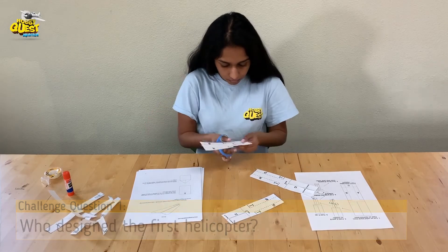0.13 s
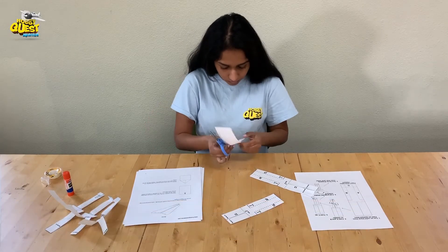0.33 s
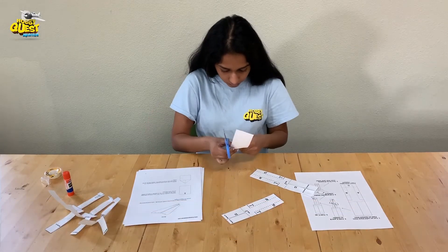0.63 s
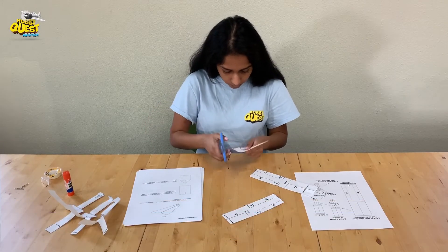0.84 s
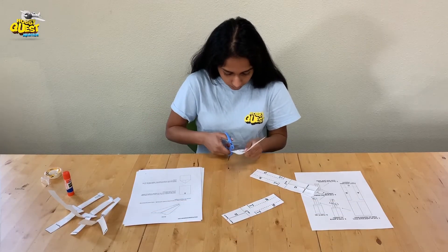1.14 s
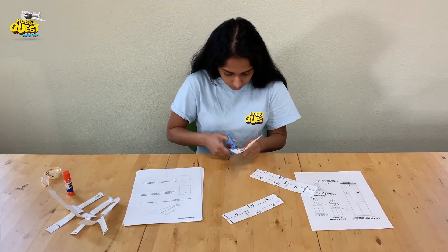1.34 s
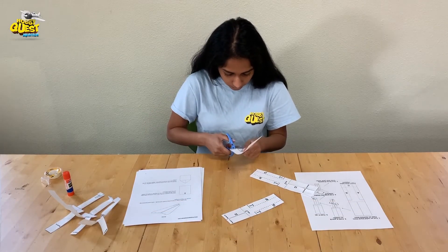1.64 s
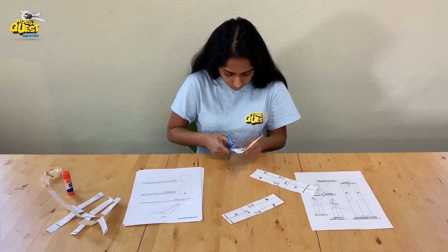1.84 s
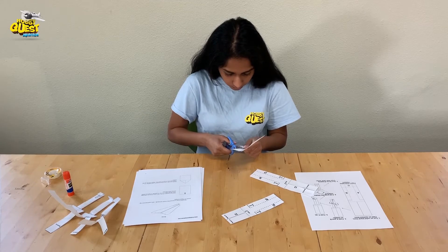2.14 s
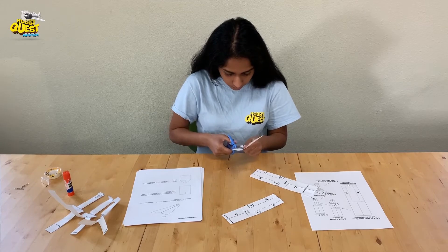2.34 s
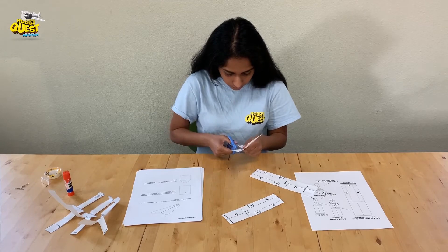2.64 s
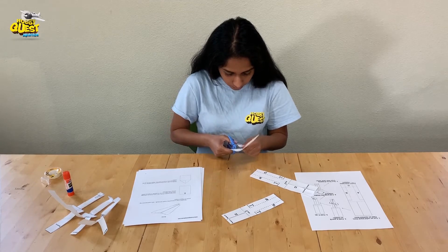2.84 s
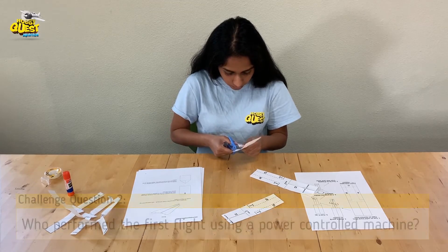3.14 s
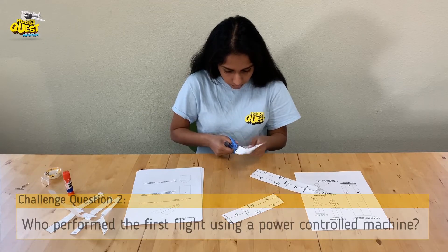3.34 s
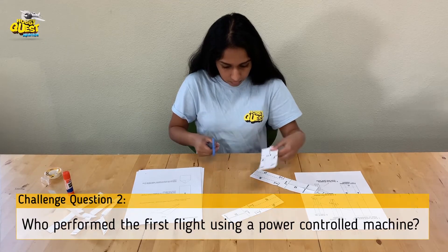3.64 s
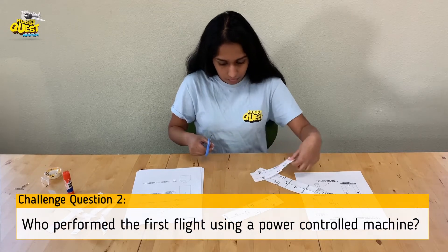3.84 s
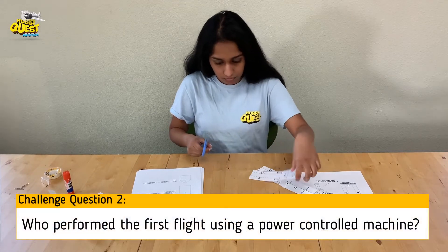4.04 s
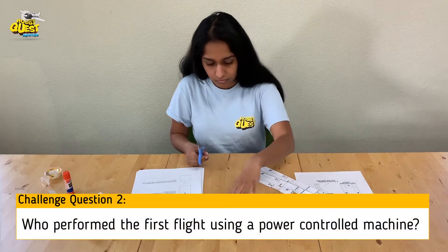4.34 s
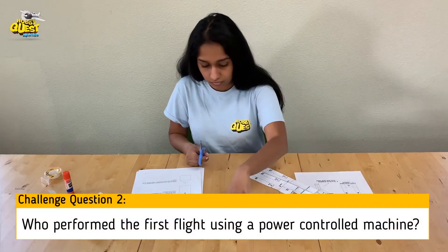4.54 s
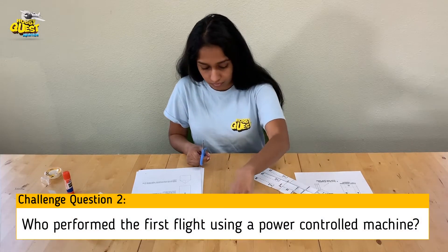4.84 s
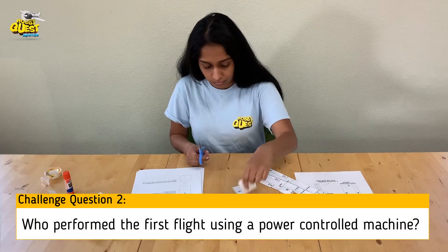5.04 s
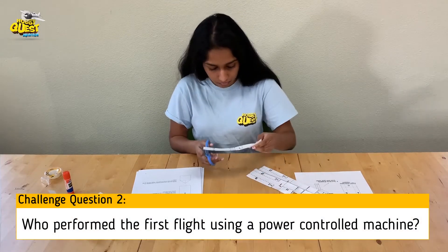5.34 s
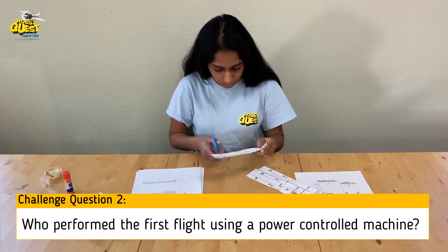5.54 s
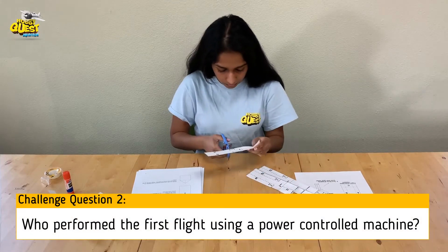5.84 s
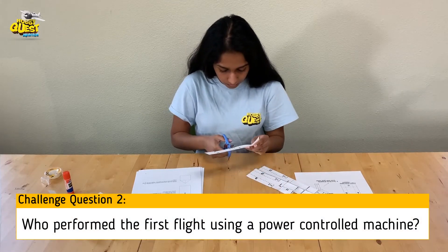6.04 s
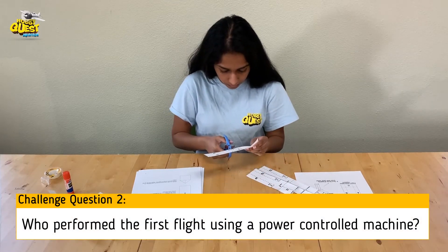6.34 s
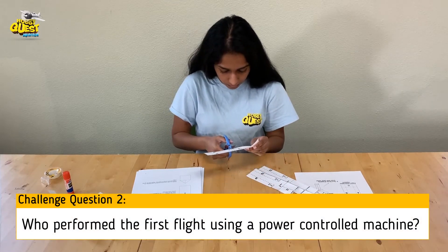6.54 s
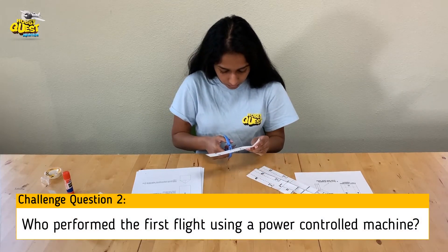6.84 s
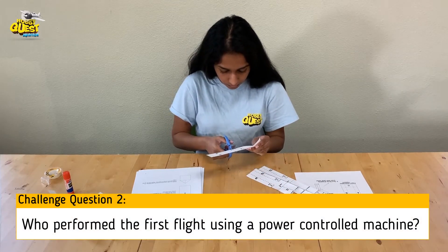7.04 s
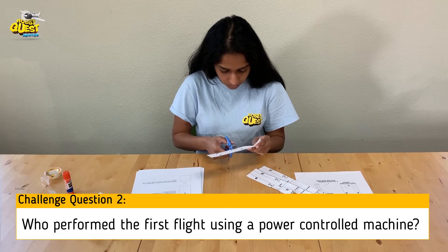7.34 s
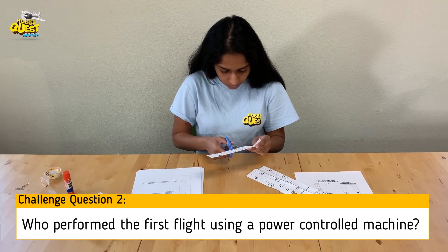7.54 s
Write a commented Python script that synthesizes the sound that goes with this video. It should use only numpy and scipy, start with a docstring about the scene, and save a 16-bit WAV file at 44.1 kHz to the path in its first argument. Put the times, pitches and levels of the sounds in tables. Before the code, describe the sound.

In a small room with a faint steady hum, paper crackles and snaps a couple of metres from the microphone. Scissors then make several short cuts, their blades clicking and the pivot squeaking briefly. The wooden table thuds softly and creaks as paper is handled with a burst of crisp snaps. The rustling dies down, leaving a few very quiet snips.

```python
"""Scissors cut paper at a wooden table in a small room, a couple of metres from a phone.
Parting fibres excite the sheet in a dense crackle and the blade edge in a rasp. Impacts ring as
paper snaps and the blades click shut; friction makes the pivot squeak and something wooden creak.
Bumps thud through floor and table. An appliance hums near twice the mains frequency and near the
octave of that, over air noise and microphone hiss."""
import sys
import numpy as np
from scipy import signal
from scipy.fft import rfft, irfft, next_fast_len
from scipy.io import wavfile

SR = 44100
rng = np.random.default_rng(int(sys.argv[2]) if len(sys.argv) > 2 else 0)


def dump_mix(stems):
    """Bounce the given channels to the path in sys.argv[1] as a 16-bit WAV at rate SR."""
    frames = np.atleast_2d(stems).T  # one column per channel
    limited = np.clip(frames, -1, 1)  # hard clip at full scale
    pcm = np.round(limited * 32767).astype(np.int16)
    wavfile.write(sys.argv[1], SR, pcm)


N = 339129
FFT_SIZE = next_fast_len(N + SR)


def undb(db):
    return 10 ** (np.asarray(db) / 20)


def level(x, db):
    """Scale to an rms level in dB."""
    return x * undb(db) / np.sqrt(np.mean(x ** 2))


def along(points, hz):
    """Interpolate (f/Hz, value) points on a logarithmic frequency axis."""
    f, v = np.transpose(points)
    return np.interp(np.log(np.maximum(hz, 1)), np.log(f), v)


def colour(x, spectrum):
    """Minimum-phase filter of the given spectral shape, with unit power gain for white noise."""
    log_gain = np.log(undb(along(spectrum, np.fft.rfftfreq(8192, 1 / SR))))
    cepstrum = irfft(log_gain)
    cepstrum[1:4096] *= 2  # folding onto positive time makes the filter causal
    cepstrum[4097:] = 0
    response = irfft(np.exp(rfft(cepstrum)))
    return signal.fftconvolve(x, response / np.sqrt(np.sum(response ** 2)))[:len(x)]


def band(x, hz, spread):
    """Band-pass from hz / spread to hz * spread."""
    return signal.sosfilt(signal.butter(2, [hz / spread, hz * spread], "bandpass", fs=SR, output="sos"), x)


def resonance(x, hz, width_hz):
    """Response of one damped mode of the given bandwidth."""
    edges = [hz - width_hz / 2, hz + width_hz / 2]
    return signal.sosfilt(signal.butter(1, edges, "bandpass", fs=SR, output="sos"), x)


def wavering_tone(hz, width_hz, waver_db):
    """Random modulation of amplitude and phase broadens a spectral line; rms 1."""
    pole = np.exp(-np.pi * width_hz / SR)
    waver = level(signal.lfilter([1], [1, -pole], rng.standard_normal((2, N))), waver_db)
    carrier = np.exp(2j * np.pi * np.cumsum(hz * np.ones(N)) / SR)
    return level((carrier * (1 + waver[0] + 1j * waver[1])).real, 0)


def swells(rows, steepness=1):
    """Sum of exponential envelopes, each held from its time t; rise and fall span 25 dB * steepness."""
    out = np.zeros(N)
    for t, rise, hold, fall, db in rows:
        i = np.arange(max(int((t - 2 * rise) * SR), 0), min(int((t + hold + 2 * fall) * SR), N))
        away = np.maximum((t - i / SR) / rise, 0) + np.maximum((i / SR - t - hold) / fall, 0)
        out[i] += undb(db - 25 * steepness * away)
    return out


def air():
    """Steady air noise and microphone hiss, coherent between the two ports only in the bass."""
    # noise spectrum: f/Hz, relative density/dB
    spectrum = [(12, -52.5), (20, -23.5), (60, -10.5), (113, -6), (177, -14), (241, -2.5), (270, -5.5),
                (319, -20.5), (434, -27.5), (698, -34.5), (1260, -35), (2080, -24.5), (3340, -44),
                (11400, -48.5), (16000, -61)]
    # likeness of left and right: f/Hz, correlation
    coherence = [(60, .93), (150, 0.94), (290, 0.24), (640, 0.07), (16000, 0.027)]
    hz = np.fft.rfftfreq(FFT_SIZE, 1 / SR)
    alike = along(coherence, hz)
    mid, side = rfft(rng.standard_normal((2, FFT_SIZE))) * undb(along(spectrum, hz))
    ports = mid * np.sqrt(1 + alike) + np.outer([1, -1], side * np.sqrt(1 - alike))
    return level(irfft(ports, FFT_SIZE)[:, :N], -59.5)


def hum():
    """Forced vibration of an appliance: wavering lines near twice and four times the mains frequency."""
    # hum lines: f/Hz, width/Hz, level/dB, left above centre/dB
    lines = [(118, 2.3, -65, -1.5), (241.1, 3.2, -61, -3)]
    return sum(np.outer(undb([db + left_db, db - left_db]), wavering_tone(hz, width, waver_db=-7))
               for hz, width, db, left_db in lines)


def tearing(changes_per_s=160, deviation_db=3):
    """Fracture is intermittent: a quick random fluctuation of level, in dB."""
    knots = np.arange(0, N, int(SR / changes_per_s))
    return deviation_db * np.interp(np.arange(N), knots, rng.standard_normal(len(knots)))


def fibres(tearing_db, breaks_per_s=12000, scatter_db=1.8):
    """Shot noise: each breaking fibre gives one impulse of random size; rms 1."""
    breaks = rng.random(N) < breaks_per_s / SR
    size = undb(scatter_db * rng.exponential(size=N) + tearing_db)
    return level(breaks * size * rng.standard_normal(N), 0)


def strokes():
    """Parting fibres drive the sheet in four frequency ranges, all modulated by the same tearing."""
    # blade on paper and paper on paper: t/s, rise/s, hold/s, fall/s, crackle level/dB,
    # then relative to the crackle: hiss/dB, sizzle/dB, flutter/dB
    cuts = [ (0.195, .003, 0.052, 0.058, -59, -22, -20, -0.5),
            (0.286, 0.0055, 0.032, 0.025, -46.5, -23, -18.5, -3.5),
            (0.324, 0.012, 0.015, 0.034, -45, -40, -42, 0.5),
            (0.354, 0.018, 0.031, 0.066, -56.5, -15, -18, 0),
            (0.589, 0.0059, 0.0018, 0.013, -46.5, -17.5, -26.5, -12.5),
            (0.6, .01, 0.028, 0.14, -62, -25.5, -19, -7),
            (0.767, 0.016, .016, 0.008, -45.5, -9.5, -31, -3.5),
            (0.792, 0.0035, 0.0043, 0.048, -30, -9.5, -24, -11.5),
            (0.83, .01, 0.035, 0.097, -56.5, -3, -28.5, -14), (1.66, 0.14, 0.11, .3, -72, -30.5, -18, -18),
            (1.814, 0.066, 0.12, .03, -96, -5, 5, -17), (1.996, 0.0037, 0.0015, 0.015, -43.5, -10, -25, -9),
            (2.041, 0.18, 0.064, 0.046, -53.5, -9, -8, -11),
            (2.279, 0.019, 0.047, 0.058, -55, -6.5, -19, -0.5),
            (2.553, 0.038, 0.012, 0.051, -51, -12, -21, -12),
            (2.684, 0.024, 0.049, 0.064, -48, -7.5, -11, -13.5),
            (2.825, 0.034, 0.046, .03, -72, -15, -29, -7),
            (2.902, 0.023, 0.065, 0.073, -58, -6.5, -35, -11.5),
            (3.056, 0.022, 0.079, 0.14, -52, -7, -37, -9.5),
            (3.299, 0.088, .15, 0.026, -53, -8.5, -27, -19),
            (3.455, .01, 0.014, 0.072, -57.5, -3, -20, -29),
            (3.492, 0.035, 0.011, 0.026, -57.5, 7.5, 11.5, -36),
            (3.522, 0.012, 0.016, 0.09, -49.5, -11.5, -38, -9),
            (3.88, 0.04, 0.087, .1, -74, -1.5, -3.5, -20), (4.23, 0.034, .004, 0.057, -86, 7, 14, -10),
            (4.698, 0.038, 0.0033, 0.084, -46.5, -26.5, -34.5, -1),
            (4.741, 0.016, 0.0022, 0.0099, -40, 0.5, -6.5, 3),
            (4.755, 0.011, 0.1, 0.061, -49.5, -7.5, -15.5, -6.5),
            (4.851, 0.003, 0.0036, 0.02, -29.5, 2, -0.5, -6), (4.875, 0.017, 0.03, 0.16, -51, 3, -7.5, 1.5),
            (4.986, 0.15, 0.0055, 0.16, -51, -11.5, -6, -15.5),
            (5.218, 0.19, 0.0036, 0.083, -54, 2, -1.5, -36),
            (5.244, 0.015, 0.0073, 0.04, -43, -45, -31, -6),
            (5.284, 0.034, 0.056, 0.021, -61, -26, -39.5, -10),
            (5.355, 0.0037, 0.0023, 0.011, -40, -22, -43, -26),
            (5.386, 0.043, 0.0043, 0.066, -58, -32, -26, 0),
            (5.533, 0.009, 0.0042, 0.071, -52.5, -1, -7, -8.5),
            (6.098, 0.0066, 0.026, 0.043, -76, 0, -24, -26),
            (6.797, 0.019, 0.0095, 0.026, -71, -23, -17, -10),
            (6.842, 0.041, 0.016, 0.036, -67, -13, -14, -20),
            (7.033, 0.014, 0.018, .06, -73.5, -13, -8.5, -18), ]
    # spectra of the sheet's four ranges: f/Hz, relative density/dB
    crackle = [(590, -47.5), (1000, -14), (1490, -8.5), (1710, -0.5), (2250, 0), (2860, -8.5), (3340, -16),
               (4200, -33.5), (5460, -51.5), (9240, -120)]
    hiss = [(2000, -30), (3400, 0.5), (3860, 4), (4890, 4), (5660, -3.5), (8500, -8), (11000, -28.5),
            (18700, -120)]
    sizzle = [(4410, -27.5), (7500, 1.5), (9270, 0), (12100, -8), (13700, -4.5), (16000, -13.5)]
    flutter = [(120, -31.5), (200, -10.5), (238, -0.5), (488, -17.5), (663, -14), (1300, -20),
               (1690, -38.5), (2860, -120)]
    rows = np.array(cuts)
    timing = rows[:, :4]
    crackle_db, hiss_db, sizzle_db, flutter_db = rows[:, 4:].T
    ranges = [(crackle, 0, 1), (hiss, hiss_db, 1.1), (sizzle, sizzle_db, 1), (flutter, flutter_db, .92)]
    tearing_db = tearing()
    out = np.zeros(N)
    for spectrum, above_db, steepness in ranges:
        envelope = swells(np.column_stack([timing, crackle_db + above_db]), steepness)
        out += colour(fibres(tearing_db) * envelope, spectrum)
    return out


def snaps():
    """Impact excitation: a click and its rattle ring near one pitch and excite blades and table."""
    # snaps of paper and blades: t/s, ring peak/dB, ring f/Hz, crack re ring/dB, crack f/Hz,
    # knock re ring/dB, rattle time constant/s
    impacts = [(0.202, -46, 1960, -32, 8000, -36, 0.0013), (0.286, -30.5, 1620, -31, 9000, -30, 0.0014),
               (0.303, -30, 1710, -11.5, 8200, -8, 0.0017), (0.3204, -27, 1830, -41, 6500, -16, 0.00096),
               (0.332, -30, 1960, -37, 6000, -1.5, 0.00079), (0.589, -47, 2302, -27.5, 6500, -7.5, 0.0015),
               (0.627, -45.5, 2250, -31.5, 6000, -14, 0.0013), (0.769, -40.5, 2050, -15, 4490, -22, 0.0024),
               (0.7886, -11.5, 1850, -2.5, 5835, -12, 0.00032),
               (1.984, -25, 1810, -12.5, 4900, -16, 0.00086), (2.578, -53.5, 1990, 7, 7640, 1, 0.00072),
               (2.687, -44, 1760, 9, 9000, -14, 0.0014), (2.702, -36.5, 2170, 4, 6500, -12.5, 0.00077),
               (2.713, -44, 2200, 3, 9100, -16, 0.001), (2.7243, -33, 2200, -4, 8000, -15, 0.001),
               (2.742, -39.5, 2220, 6, 7500, -19, 0.0015), (2.904, -42, 2050, -2, 8000, -17, 0.0013),
               (2.954, -45, 1700, 11, 8400, -8, 0.0011), (3.419, -52, 2200, 8, 7200, 0, 0.002),
               (3.536, -39.5, 1820, -16, 5000, -10, 0.001), (4.714, -42.5, 1934, -0.5, 9500, 5, 0.001),
               (4.738, -23, 2000, 6, 8800, -12.5, 0.00098), (4.7392, -22.5, 2050, 3, 5600, -13.5, 0.001),
               (4.851, -16.5, 1860, 3, 9200, -13.5, 0.0018),
               (4.8535, -15.5, 1840, 2.5, 8900, -6.5, 0.00076),
               (4.859, -15, 2300, -18.5, 7000, -8.5, 0.0023),
               (4.869, -23.5, 2282, -24.5, 7000, -13.5, 0.0017),
               (5.326, -40, 1840, -29, 7970, -7.5, 0.0014), (5.358, -48, 1970, -27, 5000, 10.5, 0.001),
               (5.5262, -47.5, 2160, 11, 12030, -9, 0.0011), (6.795, -57, 2310, 3, 6570, -13, 0.001),
               (7.031, -57.5, 2474, 1, 6400, -10, 0.0016)]
    # modes of the blades: f/Hz, width/Hz, gain/dB
    blade_modes = [(3100, 900, -4.5), (5100, 1600, 4.5), (6400, 1100, -2.5), (8117, 520, -5.5),
                   (9800, 2000, -6), (13000, 10000, -6)]
    length = 2048
    t = np.arange(length) / SR
    click = 1. * (t == 0)
    blades = sum(undb(db) * resonance(click, hz, width) for hz, width, db in blade_modes)
    table = signal.sosfilt(signal.butter(2, [380, 1300], "bandpass", fs=SR, output="sos"), click)
    table += undb(10) * resonance(click, hz=269, width_hz=16)
    out = np.zeros(N + length)
    for onset, db, hz, crack_db, crack_hz, knock_db, rattle_s in impacts:
        burst = click + .58 * rng.standard_normal(length) * np.exp(-t / rattle_s)
        ring = band(burst, hz, spread=1.32) + undb(6) * resonance(burst, hz, width_hz=80)
        crack = band(signal.fftconvolve(burst, blades)[:length], crack_hz, spread=1.55)
        knock = signal.fftconvolve(burst, table)[:length]
        ring, crack, knock = (part / np.max(np.abs(part)) for part in (ring, crack, knock))
        i = int(onset * SR)
        out[i:i + length] += undb(db) * (ring + undb(crack_db) * crack + undb(knock_db) * knock)
    return out[:N]


def thuds():
    """Structure-borne sound: a low rumble swells with each bump, nearly alike at both ports."""
    # bumps through floor and table: t/s, rise/s, hold/s, fall/s, level/dB
    bumps = [(0.33, 0.12, 0.33, 0.096, -57.5), (0.796, 0.028, 0.0035, 0.15, -51),
             (3.03, 0.41, 0.02, 0.05, -50), (3.176, 0.17, 0.0095, 0.47, -42.5),
             (3.468, 0.4, 0.012, 0.17, -60), (3.664, 0.12, 0.0035, 0.13, -52),
             (4.726, 0.053, .01, 0.66, -48.5)]
    # rumble spectrum: f/Hz, relative density/dB
    spectrum = [(15, -43.5), (25, -16), (96, -4), (129, 0), (147, -12.5), (188, -17), (241, 1),
                (330, -33.5), (430, -43.5), (730, -120)]
    mid, side = (level(colour(rng.standard_normal(N), spectrum), 0) for _ in range(2))
    return swells(bumps) * (mid + undb(-13) * np.outer([1, -1], side))


def drones():
    """Free vibration: the table top sounds one low mode after a push."""
    # notes of the table top: t/s, rise/s, hold/s, fall/s, level/dB, f/Hz
    notes = [(0.362, 0.016, 0.029, 0.12, -46.5, 241.4), (3.165, 0.055, 0.039, .15, -43.5, 92.7),
             (4.716, 0.008, 0.009, 0.036, -38, 295)]
    return sum(swells([shape]) * wavering_tone(hz, width_hz=16, waver_db=-10.5) for *shape, hz in notes)


def squeaks():
    """Friction of steel on steel excites short, unsteady tones at the pivot."""
    # rubs of the pivot: t/s, rise/s, hold/s, fall/s, level/dB, f/Hz
    rubs = [(0.593, .004, .006, .03, -48, 2350), (3.456, .005, .006, .015, -42, 2270),
            (3.473, .01, .004, .04, -45, 2250), (6.05, .02, .03, .03, -76, 2450),
            (6.7, .02, .06, .03, -77, 2450), (6.122, .01, .01, .03, -70, 1800)]
    return sum(swells([shape]) * wavering_tone(hz, width_hz=33, waver_db=-.5) for *shape, hz in rubs)


def rasps():
    """Resonant filtering: each pass sounds the fibre impulses through one resonance of the blade."""
    # passes along the edge: t/s, rise/s, hold/s, fall/s, level/dB, centre f/Hz
    passes = [(2.283, 0.019, 0.018, 0.04, -60.5, 8400), (2.55, 0.032, 0.011, 0.024, -58, 8400),
              (2.677, 0.012, 0.06, 0.021, -53, 9000), (2.824, 0.044, 0.049, .03, -72.5, 4770),
              (2.899, 0.02, 0.046, 0.021, -59, 8200), (3.051, 0.013, 0.024, 0.045, -64, 6400),
              (3.056, 0.017, 0.033, 0.045, -63.5, 8950), (3.116, 0.071, 0.022, 0.023, -65.5, 11500),
              (3.31, 0.061, 0.039, .06, -68, 12200), (4.936, .05, 0.026, 0.072, -55.5, 9800),
              (5.06, 0.059, 0.028, 0.074, -60, 8750), (3.287, 0.051, 0.12, .04, -62, 8200),
              (3.472, .03, .012, .03, -52, 8000), (3.492, 0.023, 0.011, 0.02, -45, 11100),
              (5.324, 0.034, 0.025, 0.029, -68.5, 7800), (6.098, 0.0062, 0.019, 0.039, -72, 4540),
              (2.015, 0.054, 0.036, 0.033, -62.5, 8750), (6.797, 0.0048, 0.0059, 0.017, -72, 6480),
              (6.845, .015, .015, 0.031, -65.5, 2300), (2.073, 0.069, 0.035, 0.027, -56, 2270),
              (5.208, 0.05, 0.021, .04, -56.5, 2400), (5.255, .01, 0.012, 0.043, -47.5, 2070),
              (7.03, 0.0047, 0.0068, .02, -71.5, 6400)]
    drive = fibres(tearing())
    return sum(swells([shape]) * level(band(drive, hz, spread=1.12), 0) for *shape, hz in passes)


def creak():
    """Stick-slip friction: wood sounds a few unsteady partials that bend in pitch together."""
    # slips of the wood: t/s, rise/s, hold/s, fall/s, level/dB
    slips = [(4.594, 0.011, .004, 0.16, -64), (4.688, 0.016, 0.019, 0.051, -42),
             (4.775, 0.033, 0.049, 0.036, -50), (4.85, 0.047, 0.0051, 0.016, -46)]
    # partials of the creak: f/Hz, width/Hz, relative level/dB
    partials = [(269, 8.7, -3), (542, 34, -6), (1063, 40, 1)]
    # pitch bend: t/s, frequency ratio
    bend_curve = [(4.6, 1), (4.67, .97), (4.682, .94), (4.715, 1.03), (4.74, .99), (4.79, 1.015),
                  (4.82, .985)]
    bend = np.interp(np.arange(N) / SR, *np.transpose(bend_curve))
    tones = sum(undb(db) * wavering_tone(hz * bend, width, waver_db=0) for hz, width, db in partials)
    return swells(slips) * tones


def room(x, gap_s=.0016, low_t60_s=.042, treble_t60_s=.19):
    """Direct sound, earlier on the right and louder on the left, plus exponential reverberation."""
    # phase of the direct sound: f/Hz, lead of the left port/rad
    left_lead = [(0, 0), (690, -0.3), (1550, 0.2), (2410, -0.7), (3100, -1.7), (5430, -4.8), (6460, -6.8),
                 (7410, -8.0), (9220, -7.2), (10500, -6.9), (11800, -6.3), (16200, -6.3)]
    t = np.arange(SR // 2) / SR
    mid, side = rng.standard_normal((2, len(t))) * np.clip(t / gap_s - .5, 0, 1)
    # long waves reach both ports alike
    side = signal.lfilter(*signal.butter(1, 1500, "highpass", fs=SR), side)
    diffuse = mid + np.outer([1, -1], side)
    low = signal.lfilter(*signal.butter(2, 3500, fs=SR), diffuse)
    tail = np.zeros_like(diffuse)
    for part, t60, db in (low, low_t60_s, 2), (diffuse - low, treble_t60_s, -4):
        decay = undb(-60 * t / t60)
        tail += part * decay * undb(db) / np.sqrt(2 * np.sum(decay ** 2))
    hz = np.fft.rfftfreq(FFT_SIZE, 1 / SR)
    phase = np.interp(hz, *np.transpose(left_lead))
    direct = np.array([undb(1.1) * np.exp(1j * phase), undb(-1.1) * np.ones(len(hz))])
    return irfft(rfft(x, FFT_SIZE) * (direct + rfft(tail, FFT_SIZE)), FFT_SIZE)[:, :N]


def scene():
    """Superposition of all sources at the two microphone ports."""
    airborne = room(strokes() + rasps() + snaps() + squeaks() + creak())
    return airborne + drones() + thuds() + air() + hum()


def record(dry, narrow_hz=11500, top_hz=15800):
    """Band limiting: the stereo image narrows in the high treble, and the top is cut."""
    mid, side = (dry[0] + dry[1]) / 2, (dry[0] - dry[1]) / 2
    side = signal.sosfiltfilt(signal.butter(6, narrow_hz, fs=SR, output="sos"), side)
    top_cut = signal.ellip(8, .1, 40, top_hz, fs=SR, output="sos")
    return signal.sosfiltfilt(top_cut, [mid + side, mid - side])


dry = scene()
out = record(dry)
dump_mix(out)
```